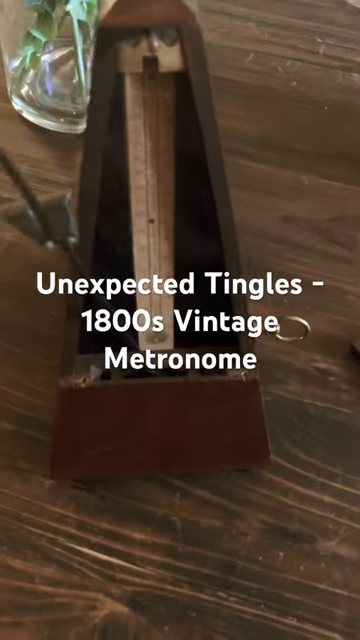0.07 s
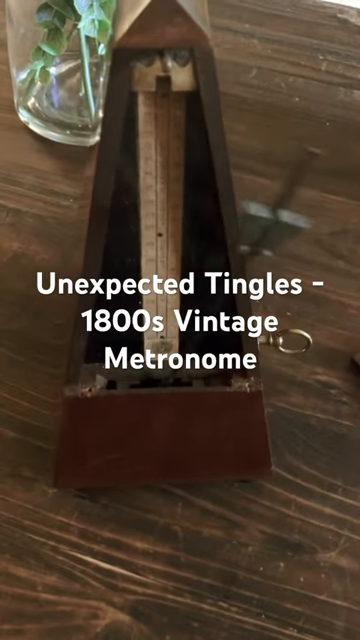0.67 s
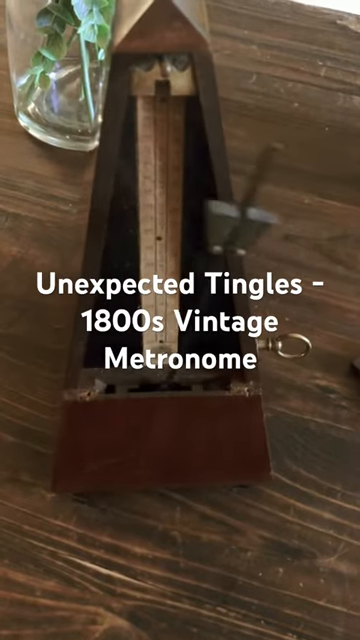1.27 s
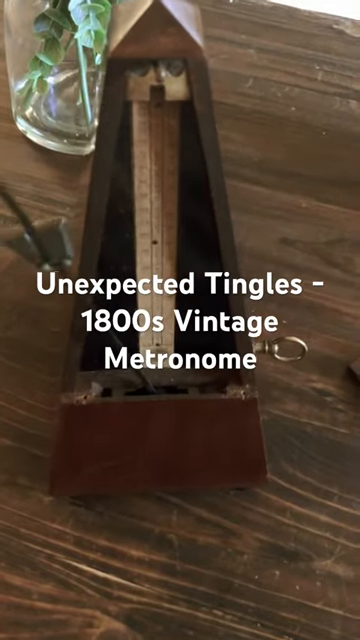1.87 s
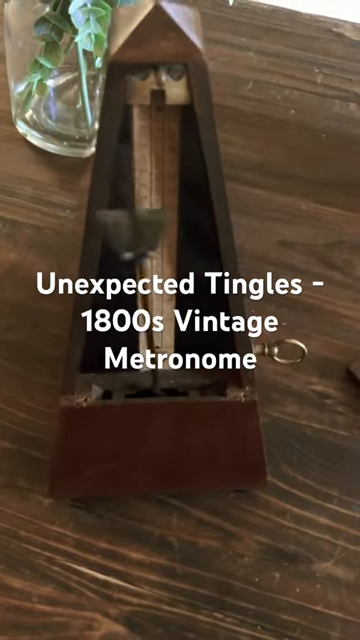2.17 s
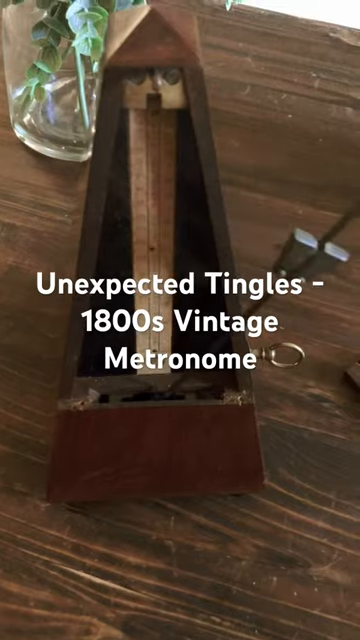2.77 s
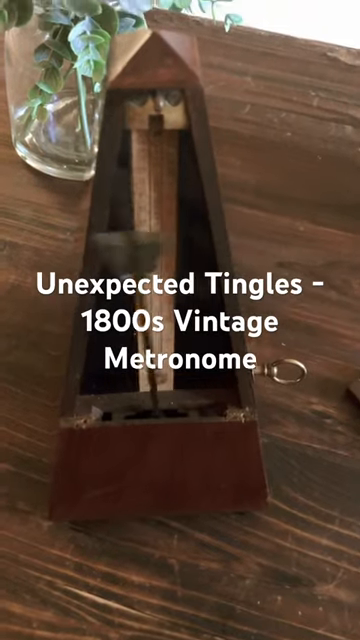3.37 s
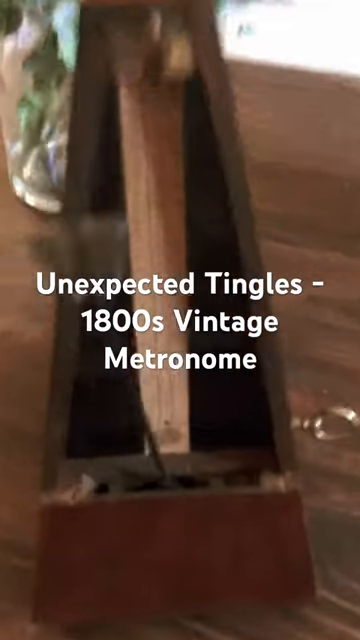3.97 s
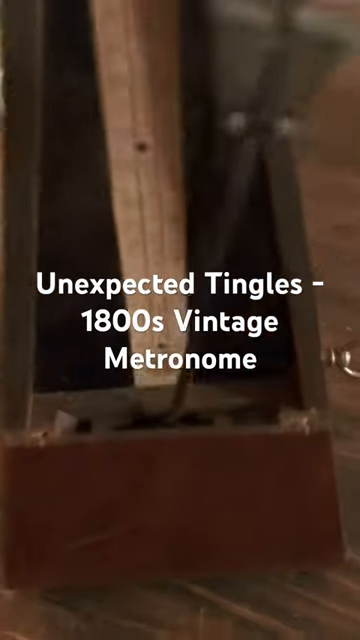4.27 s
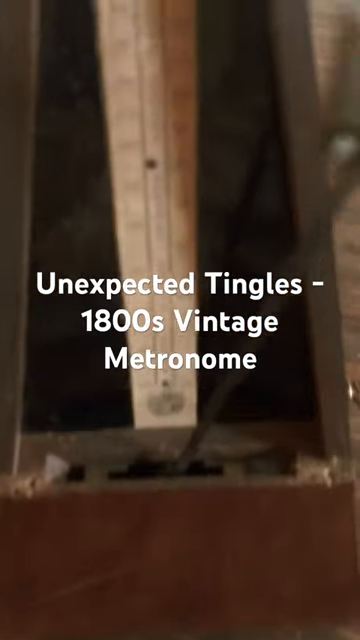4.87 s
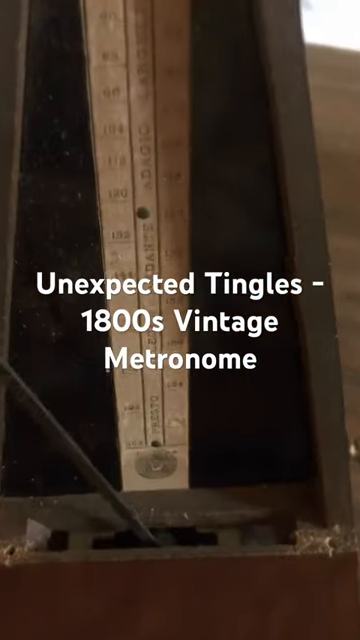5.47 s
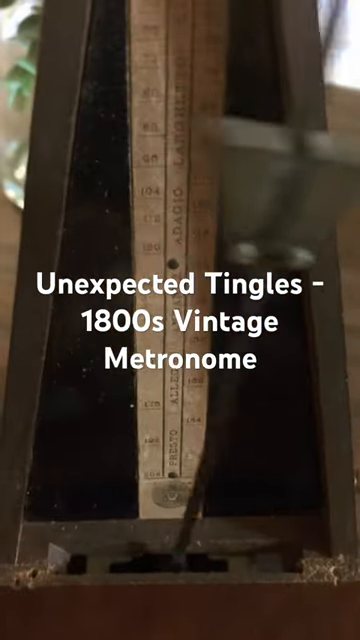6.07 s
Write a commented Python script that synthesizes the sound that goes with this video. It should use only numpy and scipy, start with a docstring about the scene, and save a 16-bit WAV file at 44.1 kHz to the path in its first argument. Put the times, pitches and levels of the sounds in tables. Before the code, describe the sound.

A wooden pyramid metronome beats on a table at about 65 beats a minute. Each beat is a faint knock from the clockwork, followed a moment later by a sharp, dry wooden tick. Six ticks pass at an even pace, alternating slightly in brightness. They sound close, with a short room reverberation, over a very faint hum and low rumble.

```python
"""A soft knock, then a sharp wooden tick: a pyramid metronome beats about 65 times a minute on a table.
The knock is the pendulum picking up the escape wheel, which excites the modes of the clockwork frame.
The tick is a tooth dropping on a pallet, an impact that rings the case and the table top under it.
The quiet room answers with early reflections and a short reverberation, over a faint hum and rumble."""
import sys
import numpy as np
from scipy import signal
from scipy.fft import rfft, irfft, next_fast_len
from scipy.io import wavfile
from scipy.ndimage import map_coordinates

SR = 44100
rng = np.random.default_rng(int(sys.argv[2]) if len(sys.argv) > 2 else 0)


def pcm_store(signal):
    """Save signal as 16-bit PCM."""
    levels = np.round(np.clip(np.atleast_2d(signal), -1, 1) * 32767)
    wavfile.write(sys.argv[1], SR, levels.astype(np.int16).T)


N = 270333

# a tooth drops on each of the two pallets in turn: (time [s], level [dB])
TOOTH_DROPS = [(0.6744, -4.5), (1.5718, -5), (2.4693, -4.5), (3.435, -4.5), (4.3534, -5), (5.2515, -5.5)]


def ticks(rattle_db=-8, contact_hz=10800, tock_db_per_octave=1.0):
    """Impact excitation: hard steel contacts ring the case and table and briefly rattle the clockwork."""
    # modes of the wooden case and clockwork: (frequency [Hz], level [dB], decay time T60 [s])
    case_modes = [(667, -11.5, 0.023), (777, -7, 0.0087), (979, -16.5, 0.039), (1240, -15, 0.019),
                  (1474, -16.5, 0.013), (2100, -20, 0.015), (2773, -12.5, 0.014), (3250, -16.5, 0.0123),
                  (3540, -11.5, 0.014), (3925, -2.5, 0.0078), (4290, -13, 0.015), (4327, -7, 0.0084),
                  (4935.5, -1, 0.0043), (5330, -7, 0.0123), (6080, -18, 0.016), (6800, -12.5, 0.0134),
                  (7540, -10, 0.0091), (7800, -10, 0.011), (8080, -10.5, 0.003), (9000, -46.5, 0.0089),
                  (9914, -12.5, 0.0053), (11050, -10, 0.0081), (11190, -13.5, 0.0049), (11715, -22, 0.0097),
                  (13215, -22, 0.0032), (15467, -24, 0.0035)]
    out = np.zeros(N)
    for beat, (s, db) in enumerate(TOOTH_DROPS):
        tilt = tock_db_per_octave if beat % 2 else 0  # the second pallet sounds brighter
        blow = ring(case_modes, scatter_db=0.82) + table_top()
        blow += amp(rattle_db) * contact_noise(t60=0.028, centre_hz=4500)
        add(out, s, amp(db) * filtered(blow, lambda hz: amp(tilt * np.log2((hz + 300) / 4000))))
    # the finite contact time rounds off the top treble
    out = filtered(out, lambda hz: 1 / (1 + 1j * hz / contact_hz - (hz / contact_hz) ** 2))
    return radiated(out, corner_hz=250)


def table_top(rise_s=0.0049):
    """Coupled vibration: the heavy table top under the case takes a few cycles to start ringing."""
    # modes of the table top: (frequency [Hz], level [dB], decay time T60 [s])
    top_modes = [(179, -41.5, 0.12), (302, -35, 0.091), (442, -38.5, 0.2), (566.7, -26, 0.13),
                 (752, -26, 0.085)]
    ringing = ring(top_modes, scatter_db=2.5)
    t = np.arange(len(ringing)) / SR
    return ringing * (1 - np.exp(-t / rise_s))


def knocks(scrape_db=11, firm_db=-30.5, firm_hz=2500, octaves_per_db=0.06):
    """Contact time limits bandwidth: slow contacts ring and scrape the frame, the softer the duller."""
    # the pendulum picks up the escape wheel, on each pallet in turn: (time [s], level [dB])
    pickups = [(.4660, -39), (1.3939, -41.5), (2.3073, -35.5), (3.2549, -37), (4.2020, -30.5),
               (5.0985, -45.5), (6.0975, -28.5)]
    # modes of the frame that carries the wheel: (frequency [Hz], level [dB], decay time T60 [s])
    frame_modes = [(306, -15, 0.059), (443, -15, 0.083), (580, -6, 0.049), (769.7, -2, 0.055),
                   (1030, -10, 0.048), (1266, -4, 0.039), (1450, -6.5, 0.028), (2160, -15.5, 0.029),
                   (2560, -8, 0.026), (2970, -13, 0.033), (3720, -1, 0.0204), (4972, -0.5, 0.0074)]
    out = np.zeros(N)
    for beat, (s, db) in enumerate(pickups):
        octaves = octaves_per_db * (db - firm_db) - 1.3 * (beat % 2)  # the second pallet meets softly
        contact_hz = firm_hz * 2 ** octaves
        blow = ring(frame_modes, scatter_db=0.5)
        blow += amp(scrape_db) * contact_noise(t60=0.031, centre_hz=2500)
        add(out, s, amp(db) * filtered(blow, lambda hz: 1 / (1 + 1j * hz / contact_hz) ** 2))
    return radiated(out, corner_hz=150.5)


def ring(modes, scatter_db):
    """Modal superposition: damped sines of slightly random strength, neighbours in opposite phase."""
    t = np.arange(SR // 4) / SR
    out = np.zeros(len(t))
    for k, (hz, db, t60) in enumerate(modes):
        envelope = amp(db + scatter_db * rng.standard_normal() - 60 * t / t60)
        out += (-1) ** k * envelope * np.sin(2 * np.pi * hz * t)
    return out


def contact_noise(t60, centre_hz):
    """Metal on metal excites a broad band: a decaying noise burst of unit energy."""
    t = np.arange(SR // 4) / SR
    burst = rng.standard_normal(len(t)) * amp(-60 * t / t60)
    burst = filtered(burst, lambda hz: 1j * hz / centre_hz / (1 + 1j * hz / centre_hz) ** 2)
    return burst / np.linalg.norm(burst)


def radiated(x, corner_hz):
    """Radiation efficiency: a small box moves little air below its corner frequency."""
    return filtered(x, lambda hz: (1j * hz / (corner_hz + 1j * hz)) ** 2)


def diffuse_ticks():
    """Spatial averaging: over all directions the case's peaks and notches blur into one broad clack."""
    # spectrum that all faces of the case send into the room: (frequency [Hz], level [dB])
    spectrum = [(100, -14.5), (280, 4), (480, 3), (850, 6), (1350, 4), (1750, -5.5), (2200, 0), (3800, 3.5),
                (5400, 4.5), (6100, -4), (7700, 1), (8700, -11), (10800, -7.5), (12600, -20)]
    impulses = np.zeros(N)
    for s, db in TOOTH_DROPS:
        add(impulses, s, [amp(db)])
    return filtered(impulses, lambda hz: amp(along(spectrum, hz)))


def walls(x):
    """Early reflections: each nearby surface returns a delayed, weaker copy."""
    # echoes from the nearest walls: (delay [s], level [dB])
    reflections = [(0.0125, -25), (0.0162, -28.5), (0.0194, -31), (0.0278, -30.5)]
    out = np.zeros(N)
    for delay, db in reflections:
        add(out, delay, amp(db) * x)
    return out


def reverberation(x):
    """A diffuse field varies with position: four tails crossfade as the listening point moves."""
    place = np.linspace(0, 3, N)
    shares = [np.sqrt(np.maximum(1 - abs(place - k), 0)) for k in range(4)]
    return sum(signal.fftconvolve(x * share, room_tail())[:N] for share in shares)


def room_tail(gap_s=0.01, build_s=0.0011):
    """Reverberant decay: a noise tail of unit energy starts after a short gap; treble dies first."""
    # reverberation time of the room: (frequency [Hz], decay time T60 [s])
    decay = [(200, 0.36), (1000, 0.32), (4000, .34), (7500, .31), (11000, .27), (16000, 0.29)]
    hz, t, noise = signal.stft(rng.standard_normal(SR // 2), SR, nperseg=256)
    tail = signal.istft(noise * amp(-60 * t / along(decay, hz)[:, None]), SR, nperseg=256)[1]
    since_gap = np.maximum(np.arange(len(tail)) / SR - gap_s, 0)
    tail *= 1 - np.exp(-since_gap / build_s)
    return tail / np.linalg.norm(tail)


def background(air_db=-59.5, swell_db=-67, hum_db=-66.5, hum_hz=118.6):
    """Ambient noise: rumble thinning into hiss, one slow bass swell and an appliance's wavering hum."""
    # spectral density of the room's noise: (frequency [Hz], relative level [dB])
    spectrum = [(22, -34), (38, -11.5), (58, -5), (85, -3), (105, -5.5), (140, -4), (235, -8.5),
                (380, -13.5), (690, -20.5), (1250, -25.5), (2200, -31), (4000, -36.5), (8000, -42),
                (15800, -49)]
    t = np.arange(N) / SR
    air_gain = amp(air_db + 0.2 * wobble(2.9))
    air = unit(filtered(rng.standard_normal(N), lambda hz: amp(along(spectrum, hz))))
    hum = np.sqrt(2) * np.sin(2 * np.pi * hum_hz * t + 0.5 * wobble(7.4))
    bass = filtered(rng.standard_normal(N), lambda hz: amp(along(spectrum, hz)) / (1 + (hz / 130.4) ** 2))
    swell = np.exp(-((t - 4.8) / 0.6) ** 2 / 2)  # peaks at 4.8 s
    return air_gain * air + amp(swell_db) * swell * unit(bass) + amp(hum_db + wobble(4.2)) * hum


def amp(db):
    """Decibels to amplitude ratio."""
    return 10 ** (np.asarray(db) / 20)


def unit(x):
    """Normalisation to rms 1."""
    return x / np.sqrt(np.mean(x ** 2) + 1e-20)


def along(points, hz):
    """Interpolation of (frequency [Hz], value) points on a logarithmic frequency axis."""
    f, v = np.transpose(points)
    return np.interp(np.log(hz + 1), np.log(f + 1), v)


def filtered(x, response):
    """Linear filtering: the spectrum of x times a complex frequency response."""
    size = next_fast_len(len(x) + 8192)
    return irfft(rfft(x, size) * response(np.fft.rfftfreq(size, 1 / SR)), size)[:len(x)]


def wobble(rate):
    """Slow modulation: a smooth curve through `rate` random values a second."""
    knots = rng.standard_normal(int(N * rate / SR) + 4)
    return map_coordinates(knots, [np.arange(N) * rate / SR])


def add(track, s, sound):
    """Superposition: mix a sound into the track from time s."""
    part = track[round(s * SR):][:len(sound)]
    part += sound[:len(part)]


def scene(knock_room_db=-17):
    """Direct sound, reflections, reverberation and ambient noise add at the listener."""
    tick, knock = ticks(), knocks()
    echo = walls(tick + knock) + reverberation(diffuse_ticks() + amp(knock_room_db) * knock)
    return (tick + knock + echo + background())[None]


def record(dry, top_hz=16500):
    """Band limiting: a steep low-pass removes the highest treble."""
    return filtered(dry[0], lambda hz: 1 / np.sqrt(1 + (hz / top_hz) ** 120))[None]


dry = scene()
out = record(dry)
pcm_store(out)
```